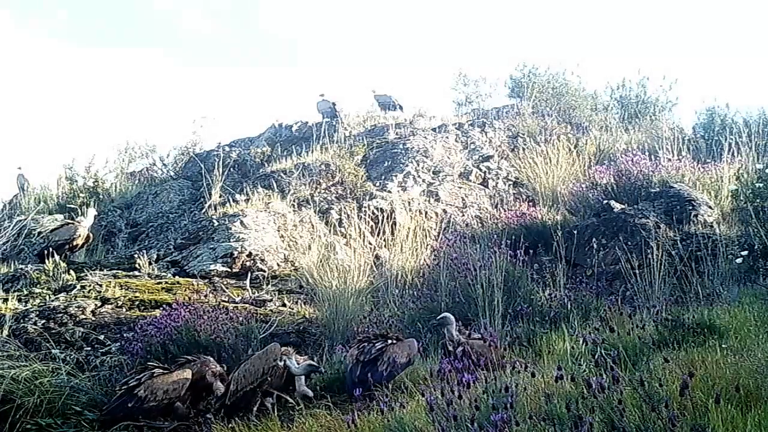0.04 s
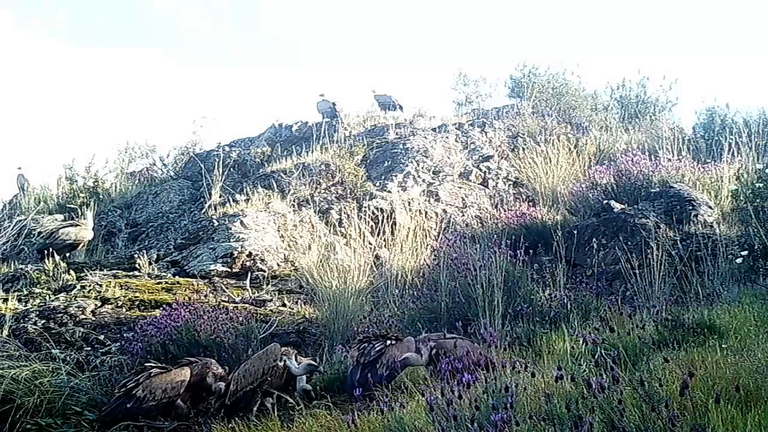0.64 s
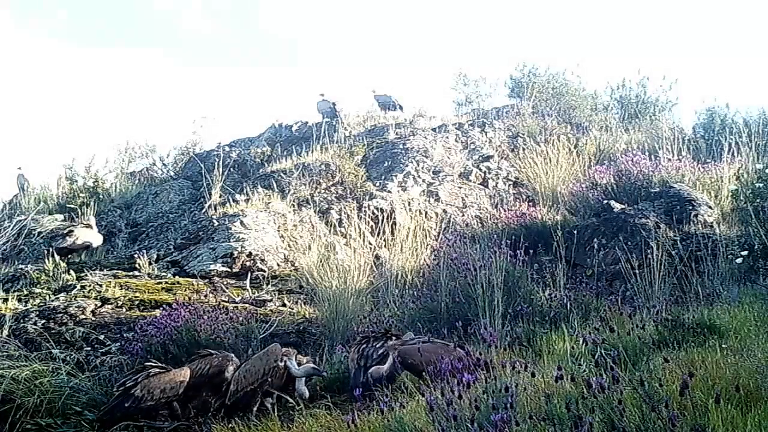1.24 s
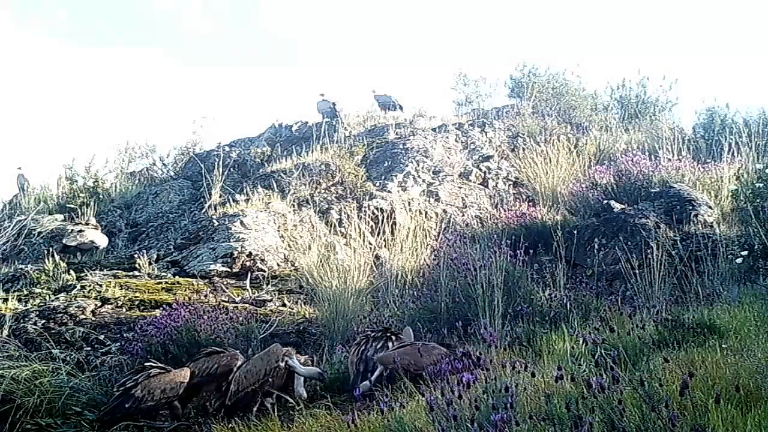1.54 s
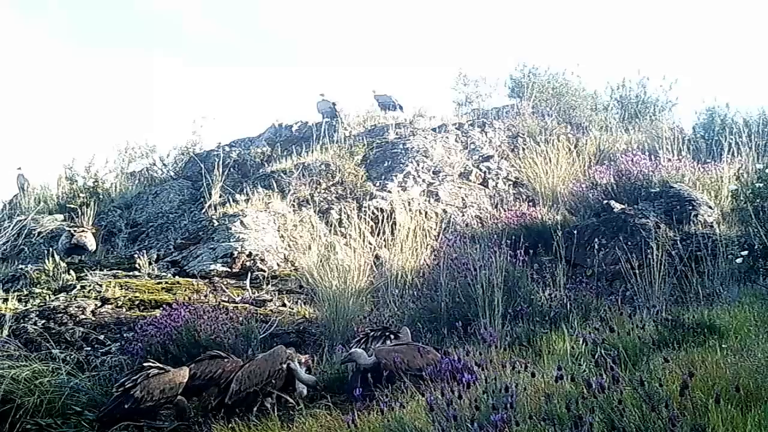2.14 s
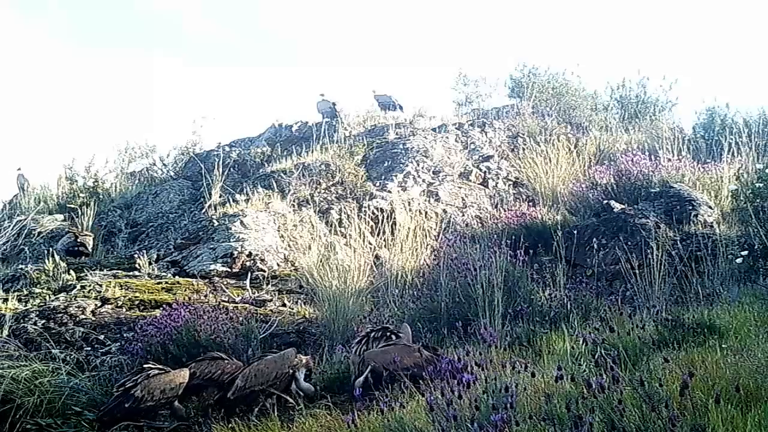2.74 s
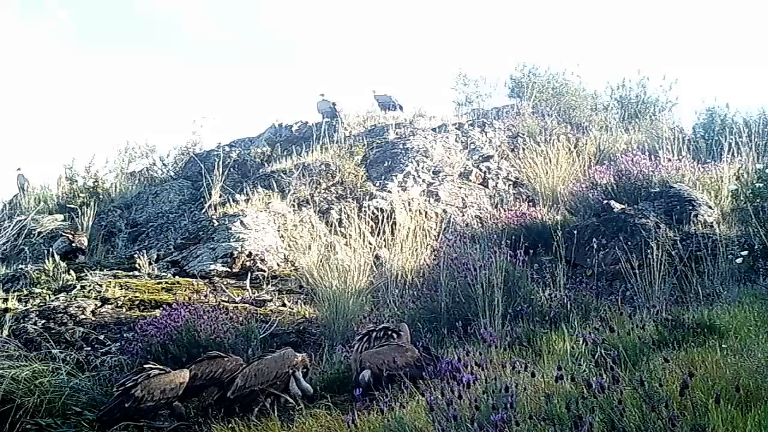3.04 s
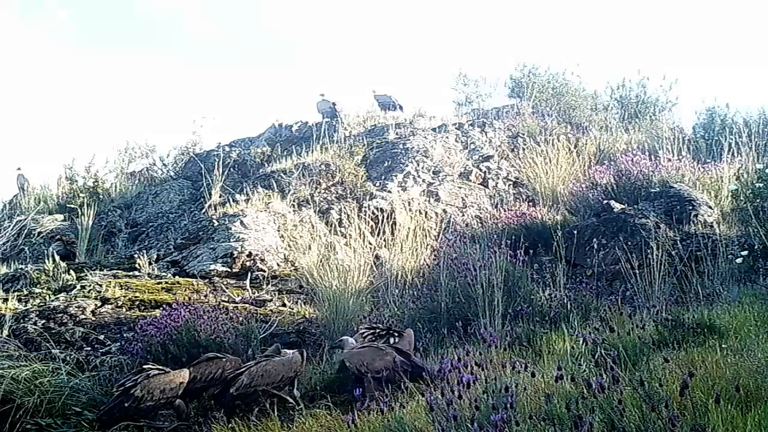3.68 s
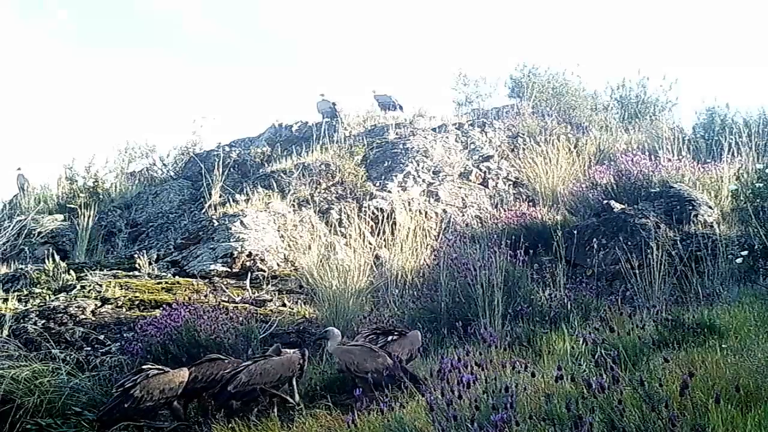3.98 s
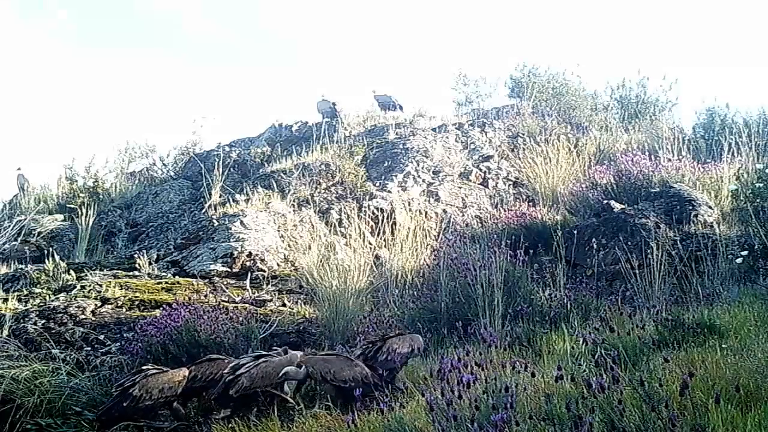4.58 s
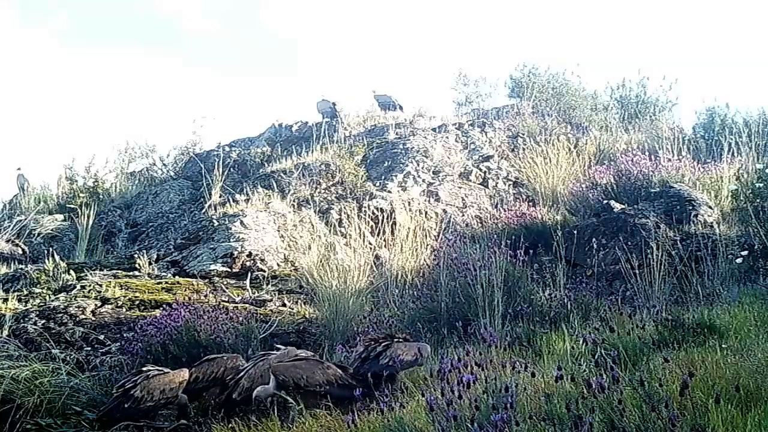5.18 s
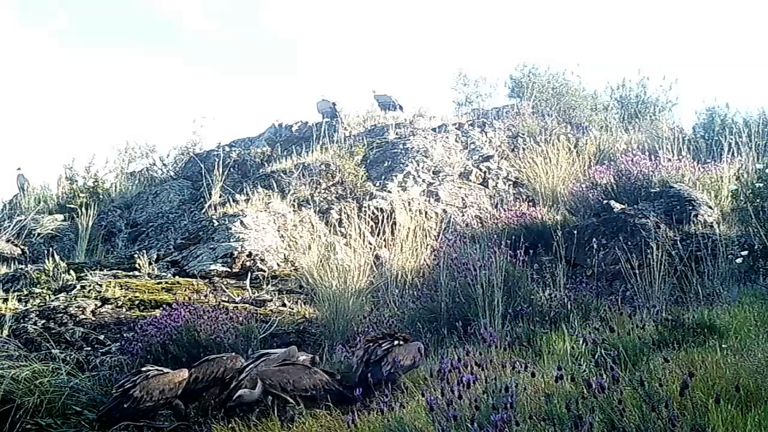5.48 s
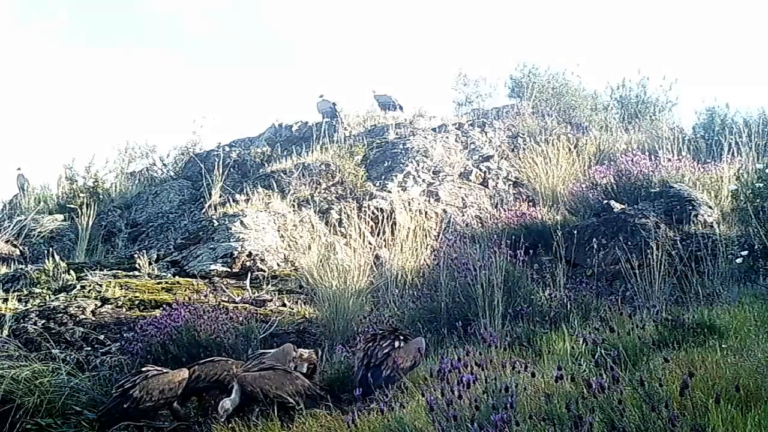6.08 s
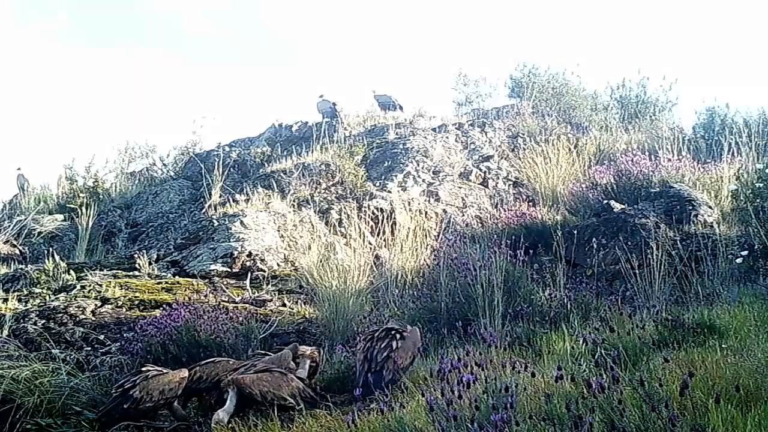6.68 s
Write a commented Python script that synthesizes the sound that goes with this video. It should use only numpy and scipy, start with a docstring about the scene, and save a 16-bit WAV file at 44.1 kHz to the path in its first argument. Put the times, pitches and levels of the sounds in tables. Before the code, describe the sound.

On a scrubby slope, dry stems crack under jostling vultures while small birds pipe, chip and trill near and far. The song and rustling grow busiest around the middle, then thin out as more stems snap, with a few faint, distant rasps. Chirps pick up again at the end. Everything comes through a hissy, low-quality microphone with a slight outdoor echo.

```python
"""Vultures feeding amid songbirds

Dry stems snap and rustle under jostling vultures on a scrubby hillside. Songbirds sing all around:
one pipes a level note, one swells into a run of down-slurs, others whistle low, trill or chip.
The slope scatters a little back. A small, hissy camera samples at 8 kHz, mirroring the song upward."""
import sys
import numpy as np
from scipy import signal
from scipy.fft import rfft, irfft, next_fast_len
from scipy.io import wavfile
from scipy.ndimage import map_coordinates

SR = 44100
rng = np.random.default_rng(int(sys.argv[2]) if len(sys.argv) > 2 else 0)


def bounce(signal):
    """Save signal as a 16-bit WAV file at the path given by the first command-line argument."""
    frames = np.transpose(np.atleast_2d(signal))
    limited = np.clip(frames, -1, 1)
    pcm = np.round(limited * 32767).astype(np.int16)
    wavfile.write(sys.argv[1], SR, pcm)


N = 300762

# Table levels are relative.
# breaking stems (time [s], level [dB], ring [Hz])
STEM_SNAPS = [(0.3342, -29.5, 2800), (0.5225, -26.5, 1664), (0.5257, -34.5, 2520), (0.5314, -33, 3510),
              (1.1606, -32.5, 3270), (1.3104, -34, 2330), (2.4106, -35, 2440), (4.7498, -32, 2550),
              (5.02, -39, 2790), (5.0492, -28, 2820), (5.0817, -22, 2690), (5.141, -30.5, 2920),
              (5.454, -34.5, 2580), (5.5758, -27, 2680), (5.9445, -31.5, 3476), (5.949, -25.5, 2593),
              (6.4228, -35, 2330)]
# rustle spectrum (frequency [Hz], level [dB])
GRASS_SPECTRUM = [(500, -15), (1500, -21.5), (2100, -2.5), (2600, -1.5), (3400, -4), (3700, -4),
                  (4000, -6.5)]
# level note, about two a second (start [s], pitch [Hz], level [dB])
PIPE_NOTES = [(0.14, 3529, -49.5), (0.62, 3500, -48.5), (1.062, 3493, -51), (1.492, 3462, -50),
              (1.968, 3467, -50), (2.445, 3457, -48), (2.905, 3413, -47.5), (3.35, 3470, -49),
              (3.84, 3450, -47.5), (4.33, 3427, -46), (4.808, 3454, -49), (5.208, 3458, -52)]
# lead bird's swelling run of hooked down-slurs (start [s], pitch [Hz], level [dB])
LEAD_SLURS = [(3.255, 3060, -49.5), (3.385, 3185, -44), (3.532, 3120, -44.5), (3.683, 3270, -43),
              (3.828, 3430, -43.5), (3.986, 3430, -43.5), (4.096, 3320, -43.5), (4.215, 3309, -40),
              (4.344, 3366, -41), (4.587, 3360, -41.5)]
# short arched chips (start [s], length [s], pitch [Hz], glide [Hz], level [dB])
CHIP_NOTES = [(0.086, 0.029, 3090, 42.5, -46.5), (0.485, 0.037, 3510, 140, -50.5),
              (0.64, 0.032, 3800, 300, -54), (0.985, 0.018, 3430, 262.5, -51),
              (1.64, 0.024, 3372, 400, -51), (1.888, 0.042, 3530, -30, -48), (2.715, 0.023, 3650, 90, -46),
              (2.735, 0.06, 3360, -290, -46), (1.82, 0.03, 2950, 300, -54),
              (2.838, 0.026, 3595, 490, -46.5), (2.885, 0.027, 3120, 120, -46),
              (3.003, 0.027, 3050, 310, -48.5), (3.068, 0.041, 3262, 853.5, -49),
              (3.216, 0.035, 3350, 678.5, -49), (4.198, 0.027, 3309, 0, -42.5),
              (4.326, 0.037, 3526, 88, -37.5), (4.41, 0.0405, 2740, -42.5, -47.5),
              (4.466, 0.038, 3550, 6, -37.5), (4.52, 0.048, 2830, -220, -48), (4.758, 0.02, 2635, 310, -46),
              (6.446, 0.04, 3550, -31, -51.5), (6.576, 0.02, 2970, 70, -49), (6.622, 0.014, 3830, 140, -45),
              (6.643, 0.0155, 3527, -200, -41.5), (6.698, 0.0198, 3680, 20, -48.5),
              (6.67, 0.019, 3490, -60, -47), (6.72, 0.035, 2610, -77, -45.5)]
# small bird's steep down-sweeps (start [s], pitch [Hz], level [dB])
ZIP_NOTES = [(0.607, 3030, -55), (0.762, 3250, -56), (0.878, 2840, -56.5), (0.945, 3350, -54),
             (1.248, 3350, -54.5), (1.335, 3270, -56.5), (1.427, 3290, -54.5), (1.708, 3520, -50),
             (6.208, 3077, -52.5)]
# low, clear whistles (start [s], length [s], pitch [Hz], glide [Hz], level [dB])
WHISTLE_NOTES = [(0.411, 0.058, 2145, 53, -53), (1.976, 0.22, 1895, 323, -56.5),
                 (2.351, 0.039, 2110, -130, -50.5), (2.591, 0.075, 2010, -264, -50.5),
                 (3.096, 0.11, 2330, 146, -49), (3.646, 0.042, 2120, 160, -48.5),
                 (3.676, 0.17, 1850, 280.5, -55.5), (3.831, 0.064, 2135, -150, -47.5),
                 (4.036, 0.055, 2595, -150, -47.5), (4.256, 0.096, 2610, -45, -46),
                 (4.251, 0.16, 2495, -6, -52), (4.806, 0.0676, 2660, -52, -50.5),
                 (4.951, 0.04, 2520, -140, -50)]
# burry trills (start [s], length [s], pitch [Hz], glide [Hz], level [dB], warble rate [1/s])
TRILL_NOTES = [(0.026, 0.29, 2178, -135, -53.5, 45), (0.086, 0.204, 2547, 166, -49, 59.5),
               (1.746, 0.074, 3230, -1150, -45.5, 60), (2.25, 0.11, 2534, -620, -49.5, 75),
               (2.666, 0.19, 2166, 410, -48, 104), (3.411, 0.13, 1886, 167, -55.5, 27),
               (3.696, 0.14, 2246, -9, -48.5, 40), (4.116, 0.1, 2252, 258, -49, 45),
               (4.556, 0.17, 2143, -64, -55.5, 39), (4.866, 0.081, 2880, 240, -50.5, 70),
               (6.488, 0.047, 3000, -690, -49, 65), (6.655, 0.0553, 3060, -600, -52.5, 61),
               (6.748, 0.036, 3260, 180, -52.5, 66)]
# envelope of far birds and trampled grass (time [s], level [dB])
THICKET_LEVEL = [(0.0, -50.5), (1.06, -53), (1.42, -52.5), (1.88, -51), (2.07, -50), (2.28, -63.5),
                 (2.77, -54), (2.91, -46), (3.72, -44), (4.42, -47.5), (4.6, -48.5), (5.41, -63),
                 (5.77, -58), (6.08, -50.5), (6.4, -53.5), (6.82, -49)]
# far hoarse calls (start [s], resonance [Hz], level [dB])
HOARSE_CALLS = [(3.93, 1400, -57), (5.86, 1702, -55), (6.03, 1700, -54)]
# slope echo decay (frequency [Hz], T60 [s])
SLOPE_DECAY = [(500, 0.28), (2000, 0.75), (4000, 0.42)]
# steady hiss spectrum (frequency [Hz], level [dB])
HISS_SPECTRUM = [(20, 0), (60, -1.5), (200, -0.5), (800, 1.5), (1600, 0), (2200, -2.5), (2700, 0.5),
                 (3200, -12), (3600, -3.5), (4000, -14)]
# camera's leaky smoothing filter (frequency [Hz], gain [dB])
SMOOTHING_RESPONSE = [(3900, 0), (4500, -4), (5000, -9.5), (5500, -13.5), (6000, -19), (6500, -26),
                      (7000, -34), (7500, -42), (8000, -39), (8500, -40), (9000, -40), (10000, -27.5),
                      (11000, -22.5), (12000, -19), (12500, -22), (13500, -29.5), (14500, -39),
                      (15500, -39.5)]

CAMERA_RATE_HZ, CUTOFF_HZ = 8000, 15830


def stem_snaps(ring_t60_s, crack_t60_s, crack_db, splinter_t60_s, splinter_db, gain_db):
    """A stem breaks with a broad crack and a very short ring, then its fibres splinter."""
    out, t = np.zeros(N), np.arange(SR // 12) / SR
    fibres = grass_rustle(grains_per_s=2900, spread_db=3.0)
    for time_s, db, ring_hz in STEM_SNAPS:
        attack = 1 - np.exp(-t / 0.00076)
        ring = np.sin(2 * np.pi * ring_hz * t) * amp(-60 * t / ring_t60_s) * attack
        crack = np.diff(rng.standard_normal(len(t) + 1)) * amp(crack_db - 60 * t / crack_t60_s)
        splinters = np.roll(fibres, -round(time_s * SR))[:len(t)]
        splinters *= amp(splinter_db - 60 * t / splinter_t60_s)
        add(out, time_s, amp(db + gain_db) * (ring + crack + splinters))
    return out


def grass_rustle(grains_per_s, spread_db):
    """Dry grass crackles in tiny grains of uneven size."""
    grains = (rng.random(N) < grains_per_s / SR) * rng.standard_normal(N)
    grains *= amp(spread_db * np.minimum(rng.exponential(size=N), 3))
    return unit(equalized(grains, GRASS_SPECTRUM))


def birdsong(notes, arch_hz, gain_db, taper, waver_hz, flutter_db):
    """Gliding notes in one manner of singing; pitch bulges mid-note by arch_hz, or sags if negative."""
    out = np.zeros(N)
    for start_s, length_s, pitch_hz, glide_hz, db, *warble in notes:
        arc_hz = pitch_hz + np.array([-glide_hz - arch_hz, arch_hz, glide_hz - arch_hz]) / 2
        tone = syrinx_note(length_s, arc_hz, taper, waver_hz, flutter_db, *warble)
        add(out, start_s, amp(db + gain_db) * tone)
    return out


def syrinx_note(length_s, arc_hz, taper, waver_hz, flutter_db, warbles_per_s=0):
    """One tone arcing through three pitches, with an optional fast warble."""
    size = max(int(length_s * SR), 64)
    warble = np.sin(2 * np.pi * warbles_per_s * np.cumsum(1 + 0.058 * wobble(34.6, size)) / SR)
    swing_hz = 1.95 * warbles_per_s  # faster is wider
    contour_hz = np.polyval(np.polyfit([0, .5, 1], arc_hz, 2), np.linspace(0, 1, size))
    hz = contour_hz + waver_hz * wobble(163.4, size) + swing_hz * warble
    envelope = signal.windows.tukey(size, taper) * amp(flutter_db * wobble(106, size))
    throb = 1 + 0.26 * warble  # loudest at the top of each warble
    return unit(envelope * throb * np.sin(2 * np.pi * np.cumsum(hz) / SR))


def far_chorus(count, centre_hz, spread_hz, max_slur_hz, typical_s):
    """Many far birds: thin, quick slurs at scattered times and pitches."""
    out = np.zeros(N)
    for k, (jitter, pitch, bend, stretch, level) in enumerate(rng.uniform(-1, 1, (count, 5))):
        hz = centre_hz + spread_hz * pitch
        slur_hz = max_slur_hz * np.sign(bend) * np.sqrt(abs(bend))
        arc_hz = [hz + slur_hz, hz, hz - slur_hz]
        length_s = typical_s * np.exp(.5 * stretch)
        tone = syrinx_note(length_s, arc_hz, taper=0.45, waver_hz=48.4, flutter_db=2.14)
        add(out, (k + jitter) / count * N / SR, amp(4.5 * level) * tone)
    return unit(out)


def hoarse_calls(length_s, half_width_hz):
    """Far, toneless rasps swell and fade, each in one narrow resonance."""
    out, size = np.zeros(N), int(length_s * SR)
    for start_s, centre_hz, db in HOARSE_CALLS:
        noise = rng.standard_normal(N)
        rasp = filtered(noise, lambda hz: 1 / (1 + ((hz - centre_hz) / half_width_hz) ** 2))
        add(out, start_s, amp(db) * np.hanning(size) * unit(rasp)[:size])
    return out


def hillside(x, early_db, tail_db):
    """Ground and nearby rocks reflect at once; scrub and slope leave a short tail."""
    hz, t, spectra = signal.stft(rng.standard_normal(SR // 2), SR, nperseg=256)
    decay = amp(-60 * t / log_interp(SLOPE_DECAY, hz)[:, None])
    tail = signal.istft(spectra * decay, SR, nperseg=256)[1]
    echo = amp(tail_db) * tail / np.linalg.norm(tail)
    for delay_s, sign in zip(rng.uniform(0.003, .03, size=8), rng.choice([-1, 1], size=8)):
        echo[int(delay_s * SR)] += sign * amp(early_db)
    return x + signal.fftconvolve(x, echo)[:N]


def camera_hiss():
    """Steady coloured noise."""
    return unit(equalized(rng.standard_normal(N), HISS_SPECTRUM))


def repeated(calls, length_s, glide_hz):
    """Note rows with the same syllable at each call."""
    return [(start_s, length_s, hz, glide_hz, db) for start_s, hz, db in calls]


def amp(db):
    """Decibels to gain."""
    return 10 ** (np.asarray(db) / 20)


def unit(x):
    """x at rms 1."""
    return x / np.sqrt(np.mean(x ** 2) + 1e-20)


def log_interp(table, hz):
    """Table value at hz, on a log frequency axis."""
    knots_hz, values = np.transpose(table)
    return np.interp(np.log(hz + 1), np.log(knots_hz + 1), values)


def wobble(knots_per_s, size):
    """Smooth random curve."""
    knots = rng.standard_normal(int(size * knots_per_s / SR) + 4)
    return map_coordinates(knots, [np.arange(size) * knots_per_s / SR])


def filtered(x, response):
    """x through a gain function of frequency."""
    size = next_fast_len(N + SR // 2)
    return irfft(rfft(x, size) * response(np.fft.rfftfreq(size, 1 / SR)), size)[:N]


def equalized(x, table):
    """x through a table of (frequency [Hz], gain [dB])."""
    return filtered(x, lambda hz: amp(log_interp(table, hz)))


def add(track, start_s, sound):
    """Mix sound into track."""
    part = track[max(round(start_s * SR), 0):][:len(sound)]
    part += sound[:len(part)]


def scene():
    """Birds and feeding noises, near and far on the slope, over hiss."""
    pipes = birdsong(repeated(PIPE_NOTES, length_s=0.1233, glide_hz=-5.5),
                     arch_hz=-25.2, gain_db=-0.5, taper=0.49, waver_hz=12, flutter_db=1.1)
    lead = birdsong(repeated(LEAD_SLURS, length_s=0.0368, glide_hz=-296),
                    arch_hz=60, gain_db=0.78, taper=0.15, waver_hz=25.1, flutter_db=3.5)
    chips = birdsong(CHIP_NOTES + repeated(ZIP_NOTES, length_s=0.0278, glide_hz=-1005),
                     arch_hz=78, gain_db=0.14, taper=0.4, waver_hz=22.1, flutter_db=0.5)
    whistles = birdsong(WHISTLE_NOTES, arch_hz=-39, gain_db=1.7, taper=0.25, waver_hz=6, flutter_db=0)
    trills = birdsong(TRILL_NOTES, arch_hz=29.73, gain_db=-0.92, taper=0.08, waver_hz=24.9, flutter_db=2)
    chorus = far_chorus(count=800, centre_hz=3124, spread_hz=560, max_slur_hz=478.8, typical_s=0.024)
    grass = grass_rustle(grains_per_s=900, spread_db=3.5)
    thicket_db = np.interp(np.arange(N) / SR, *np.transpose(THICKET_LEVEL))
    thicket = amp(thicket_db) * (amp(-6) * chorus + amp(-1.5) * grass)
    stems = stem_snaps(ring_t60_s=0.0063, crack_t60_s=0.00434, crack_db=-1.5,
                       splinter_t60_s=0.034, splinter_db=-16.5, gain_db=5.5)
    near = hillside(stems + pipes + whistles, early_db=-30, tail_db=-10)
    rasps = hoarse_calls(length_s=0.1425, half_width_hz=150)
    far = hillside(lead + trills + chips + thicket + rasps, early_db=-25, tail_db=-5.5)
    return (near + far + amp(-51) * camera_hiss())[None]


def record(dry):
    """Sampling leaves mirror images around multiples of the camera's rate, only partly smoothed away."""
    band = filtered(dry[0], lambda hz: hz < CAMERA_RATE_HZ / 2)
    clock_rad = 2 * np.pi * CAMERA_RATE_HZ * np.arange(N) / SR
    image = lambda order: 2 * band * np.cos(order * clock_rad)
    smoothed = equalized(band + image(1) + image(2), SMOOTHING_RESPONSE)
    folded = amp(-40) * image(4) + amp(-41) * image(5)  # ultrasonic images alias down
    return filtered(smoothed + folded, lambda hz: hz < CUTOFF_HZ)[None]


dry = scene()
out = record(dry)
bounce(out)
```